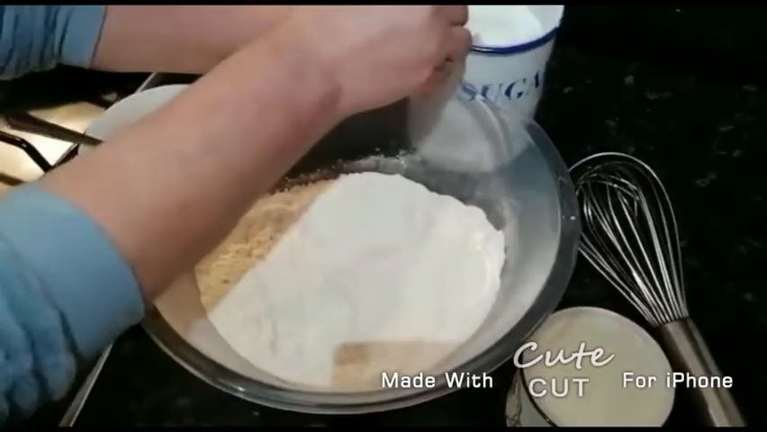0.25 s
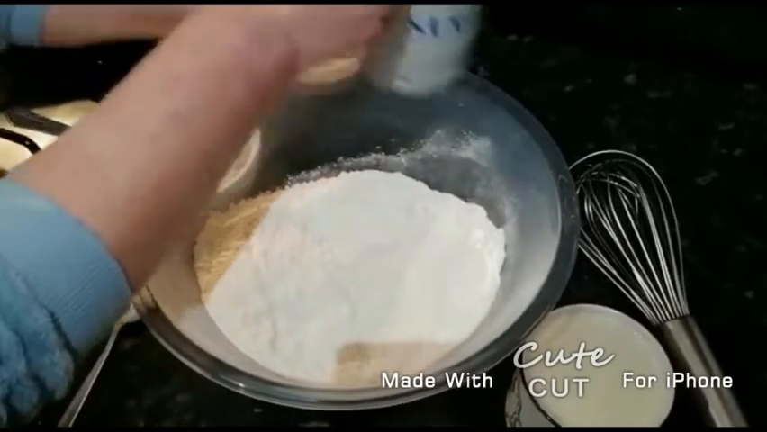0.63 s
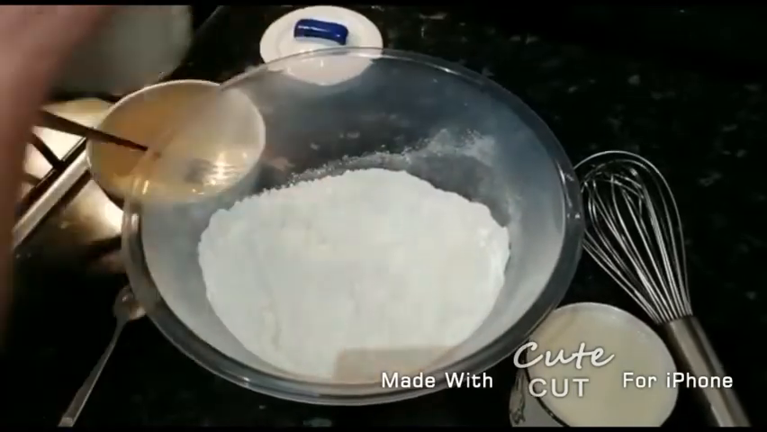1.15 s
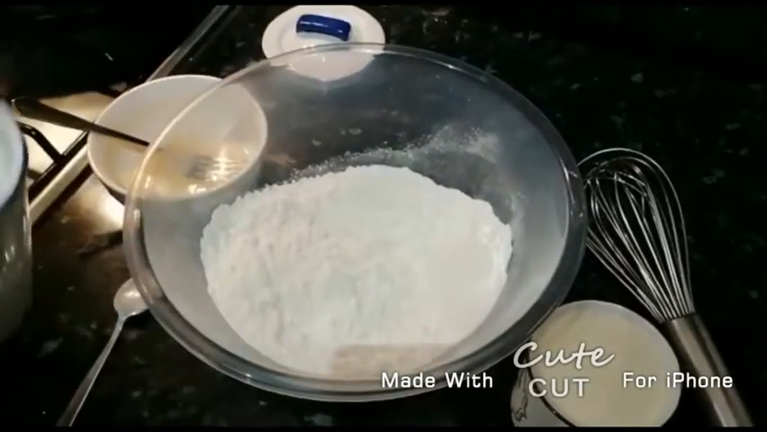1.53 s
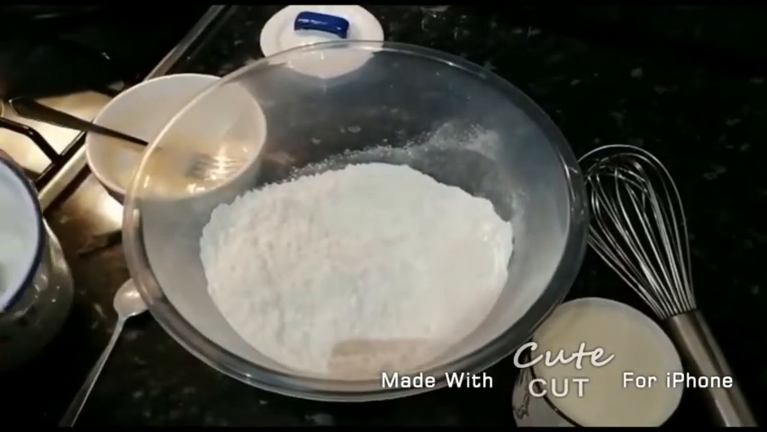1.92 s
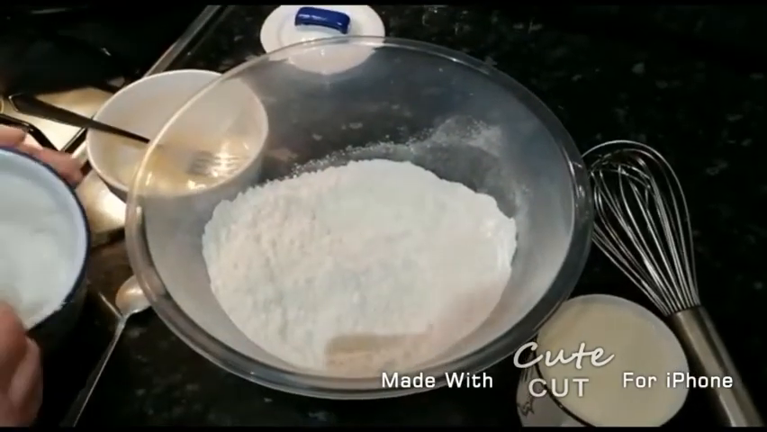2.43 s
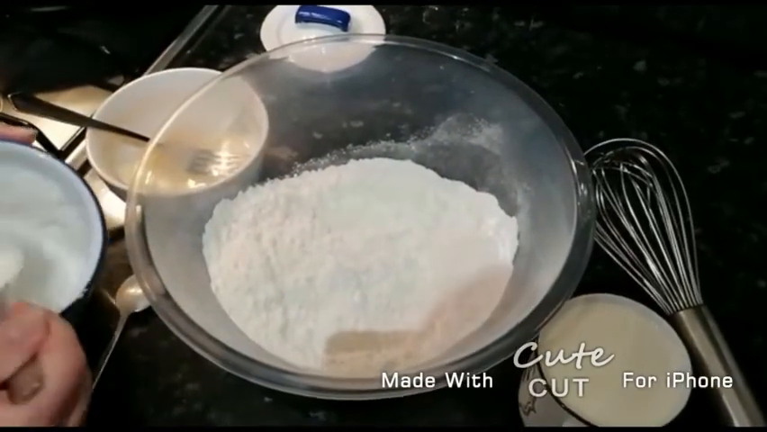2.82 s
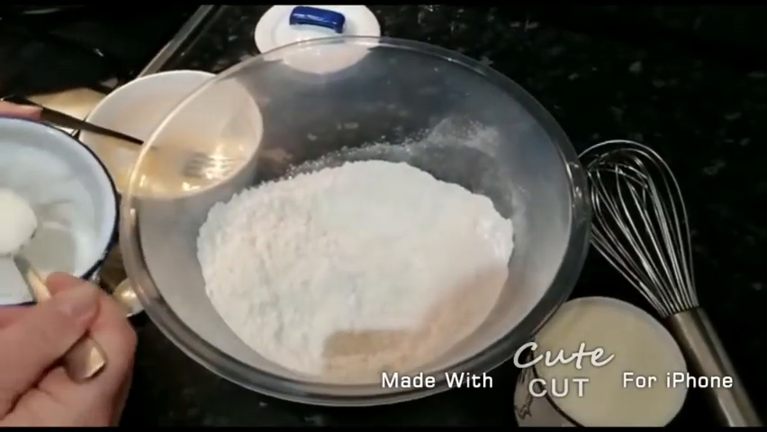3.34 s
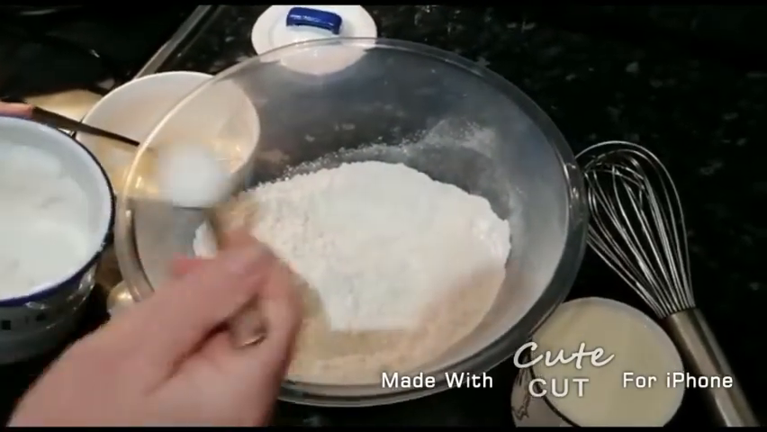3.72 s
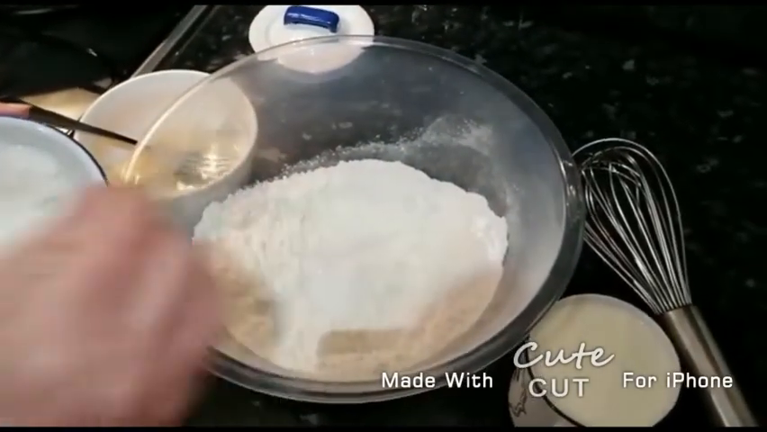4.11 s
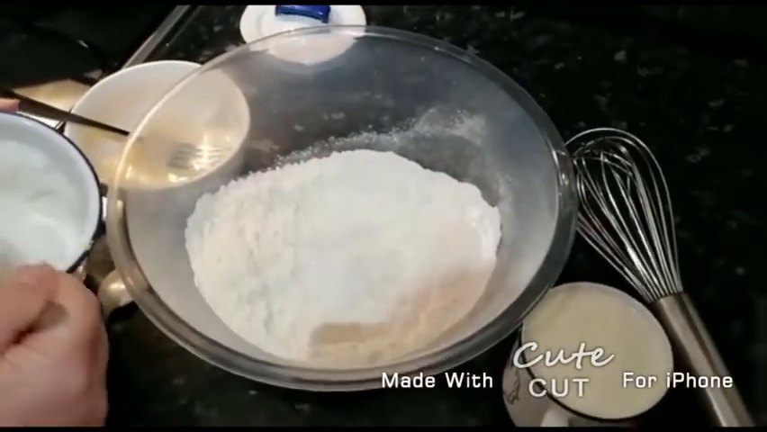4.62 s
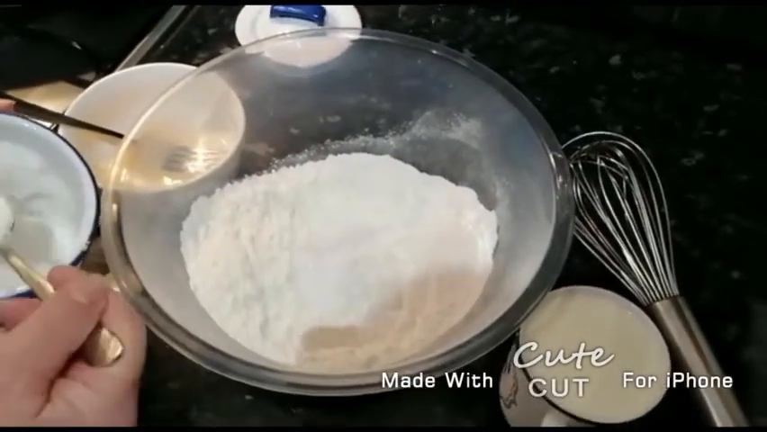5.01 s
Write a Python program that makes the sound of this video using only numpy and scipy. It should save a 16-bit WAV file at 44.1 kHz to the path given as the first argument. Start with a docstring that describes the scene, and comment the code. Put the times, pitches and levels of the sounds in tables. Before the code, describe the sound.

Close in a quiet, hard-walled kitchen, a steel spoon scrapes sugar and taps a glazed jar, then again harder at under a second. A long faint grainy rustle follows, the jar lands on the counter with a boom and clatter, a tap follows, then a softer landing. Later come faint scrapes, small ticks and a busy burst of scooping and taps. One microphone, low room rumble.

```python
"""A steel spoon scrapes sugar in a glazed jar and at once taps its wall, over the soft hum of a quiet kitchen.
More strokes, taps and small ticks follow; twice the jar is set down, the counter booms and the glaze rings.
Strokes are grainy noise through resonances; taps and landings are damped sines with dying noise.
Hard walls answer every hit with a noise tail; the room is shaped noise with narrow appliance notes."""
import sys
import numpy as np
from scipy import signal
from scipy.fft import rfft, irfft, next_fast_len
from scipy.io import wavfile
from scipy.ndimage import uniform_filter1d, map_coordinates

SR = 44100
rng = np.random.default_rng(int(sys.argv[2]) if len(sys.argv) > 2 else 0)


def wav_out(sig):
    """Save sig, one row per channel (or a flat mono array), as 16-bit PCM at SR to the path in sys.argv[1]."""
    wavfile.write(sys.argv[1], SR, np.round(np.clip(np.atleast_2d(sig).T, -1, 1) * 32767).astype(np.int16))


def invert_db(x):
    """Field ratio 10**(x/20) for x, a level in decibels (scalar or array-like)."""
    u = np.asarray(x, float) / 20
    return 10 ** u


N = 231569
SPAN = SR // 2  # length of one hit, in samples

# Levels are relative mix settings unless marked rms.
# Spoon and jar moving through or over sugar: start_s, length_s, scrape_db, fizz_rel_db, scrape_centre_hz
STROKES = [(0.003, 0.046, -60.5, -18, 1940), (0.058, 0.2, -58, -12, 2510), (0.697, 0.02, -65, 1.5, 2930),
           (0.76, .14, -47, -7.5, 2280), (0.937, 0.14, -64.5, -8.5, 2050), (1.029, 0.12, -60, -7, 2770),
           (1.25, 0.72, -66, -12, 2530), (1.976, 0.17, -62, 0, 4360), (2.16, 0.164, -69, -2, 3200),
           (2.483, .03, -75, -0.5, 2400), (2.548, 0.0234, -76, 0, 2400), (2.894, 0.17, -63, -19, 2610),
           (3.339, 0.13, -73, -13, 2920), (3.723, 0.068, -73.5, -4, 2580), (4.013, 0.021, -54, -30, 3900),
           (4.059, 0.14, -55, -45, 2940), (4.155, 0.025, -61.5, -0.5, 2980),
           (4.192, 0.15, -55.5, -4.5, 4050), (4.383, 0.1, -58, -24, 2075), (4.528, 0.073, -67, -7.5, 2730),
           (4.733, 0.07, -64, -15, 4060)]
# Spoon rubbing the wall so the jar's air sings: start_s, length_s, level_db
WALL_RUBS = [(0.816, 0.015, -56), (0.873, 0.018, -48.5), (4.074, 0.068, -63)]
# Fizz of crushed grains: freq_hz, density_db_per_hz
FIZZ_SPECTRUM = [(2940, -11), (5000, -12.5), (6940, -10), (7580, -7.5), (8130, -20.5), (9490, -12.5),
                 (15300, -30)]
# Spoon resonances under the grains: freq_hz, width_hz (before squaring), level_db
SPOON_MODES = [(5970, 49, 0), (7640, 80, -10), (9270, 420, -3.5), (10500, 50, -14), (11540, 190, 4)]
# Scrape of sliding grains: freq_hz, density_db_per_hz
SCRAPE_SPECTRUM = [(940, -35), (1600, 6.5), (1710, -3.5), (2160, -1.5), (2330, -2), (5040, -7.5),
                   (5500, -30), (7150, -14.5), (12100, -120)]
# Spoon taps: start_s, level_db, jar_air_rel_db, treble_rel_db, spoon_note_hz
TAPS = [(0.0486, -26.5, -17.5, -24, 2010), (0.7536, -14, -9.5, -23.5, 2627), (1.0228, -46, -5, -28, 1870),
        (2.3297, -32.5, -15, -32, 3790), (2.353, -39.5, -15, -24.5, 2050),
        (4.1846, -30, -11.5, -16.5, 1950), (4.3904, -36, -17, -28, 1987)]
# Spoon and sugar-damped jar: freq_hz, level_db, t60_s (before the taps cap and shorten it)
JAR_MODES = [(2350, -21, 0.88), (2733, 10.5, 0.16), (3330, -19, 0.08), (3770, -3.5, 0.13), (4030, 7, 0.28),
             (4600, -3, 0.26), (5370, 12, 0.011), (6300, 6, 0.09), (6206, 1.5, 0.15), (6700, -11, 0.2),
             (8200, -14, 0.19), (9040, 9, 0.14), (8980, -32, 0.31), (11800, -27, 0.39), (10700, 18, 0.17),
             (12600, -30, 0.052)]
# Air in the jar: freq_hz, level_db, t60_s
JAR_AIR_MODES = [(1338.5, 4.5, 0.063), (1382, -2.5, 0.071)]
# Noise crack of a tap: freq_hz, density_db_per_hz
TAP_SPECTRUM = [(1000, -10), (1700, -1), (2740, -0.5), (4220, 2), (4940, -4), (8190, -12.5), (9170, -18),
                (12800, -48), (15900, -9)]
# Jar pushed against the counter: start_s, level_db
NUDGES = [(0.048, -37), (2.352, -50.5), (4.1861, -43.5), (4.235, -47), (4.3893, -56.5)]
# Small clicks and short pings: start_s, level_db, pitch_hz, cycles (a third of the t60)
TICKS = [(1.024, -47.5, 4700, 26), (3.898, -44, 5720, 9.5), (3.982, -47.5, 9000, 1.5),
         (4.005, -35.5, 1980, .6), (4.085, -54, 10500, 1.5), (4.128, -24.5, 1400, 0.54),
         (4.64, -53.5, 1320, 23)]
# Jar meets counter at two spots and rocks, so each landing is a list of contacts:
# start_s, boom_db, ring_db, clatter_db, contact_ms
LANDINGS = [
    [(1.874, -5, -39.5, 0, 2.3), (1.8777, -4, -46, -5, 0.9), (1.8796, -5.5, -57, 13, 2.08),
     (1.887, -14, -29.5, -12, 0.78), (1.893, -34, -24.5, 0.5, 1.38)],
    [(2.8675, -20, -78, -34, 2.7), (2.872, -12, -56.5, -17, 2.41), (2.878, -19, -34, -10, 2.18)],
]
# Slab and cupboard below: freq_hz, level_db, t60_s
COUNTER_MODES = [(71.4, -3, 0.26), (142.3, -11.5, 0.044), (167.1, -9, 0.18), (182, 6, .15), (206, -4, 0.18),
                 (250, -4.5, 0.2), (286.2, 2.5, 0.25), (318, 3.5, 0.07), (365.7, 1, 0.11),
                 (399.2, -4.5, 0.12), (421.8, 0.5, 0.073), (472.4, -8.5, 0.17), (545.7, 0, 0.1095),
                 (641.4, 3, 0.081), (780, -2.5, 0.16), (796, -11, 0.16), (1160, -12, 0.27)]
# Jar wall, one list per landing spot: freq_hz, level_db, t60_s
GLAZE_MODES = [
    [(1770, -9.5, 0.064), (4320, -4, .17), (4340, -3, .15), (4600, -19, 0.034), (5230, -12.5, .08),
     (6100, -15.5, 0.087), (7750, -7, 0.11), (7780, -10, 0.09), (8510, -17, 0.082), (9960, -19, .06),
     (10460, -12.5, 0.041), (11680, -15, 0.062), (12590, -21.5, 0.076), (13180, -19.5, .06),
     (14340, -14, .04)],
    [(1713, -3.5, 0.066), (2620, -0.5, 0.036), (4390, -2.5, 0.062), (4530, 10.5, 0.023), (5200, -14, 0.065),
     (7740, -1, 0.063), (8700, -26, 0.041), (10600, -10.5, 0.055), (11650, -11, 0.06), (12650, -21, .04)],
]
# Line width of the glaze, one per landing spot: width_hz
GLAZE_BLUR = [13.4, 20]
# Loose shaking over the ring, one per landing spot: level_db
RATTLE_LEVELS = [14.5, 10]
# Sugar and glaze shaking after a landing: freq_hz, density_db_per_hz
RATTLE_SPECTRUM = [(880, -40.5), (1500, -13.5), (3850, -20), (4370, -1), (4910, -22), (7900, -16),
                   (15300, -26.5)]
# Unresolved small modes of a landing: freq_hz, density_db_per_hz
CLATTER_SPECTRUM = [(180, -30.5), (300, 10), (928, -25.5), (1520, -13), (2210, -22.5), (2360, -20),
                    (3120, -30), (4320, -30), (4620, -29), (15000, -52)]
# Tail of the hard walls: freq_hz, t60_s
WALL_DECAY = [(100, 0.64), (500, 0.37), (3000, 0.44), (12000, 0.26)]
# Room tone: freq_hz, density_db_per_hz
ROOM_SPECTRUM = [(18, -34.5), (30, -7), (48, -15.5), (75, -3.5), (186, -5.5), (314, -13), (441, -11.5),
                 (476, -22), (515, -17), (1250, -29), (3840, -35), (10600, -49.5), (15300, -68.5)]
# Slow drift of the rumble: time_s, level_db_rms
RUMBLE_DRIFT = [(0, -52.5), (0.4, -57.5), (1.0, -56), (2.602, -57.5), (3.4, -57), (4.8, -54.5), (5.25, -59)]
# Appliance notes: freq_hz, width_hz (before squaring), level_db_rms
HUM_NOTES = [(178, 59, -64), (450.5, 25, -74), (1197, 7.2, -79.5)]


def sugar():
    """Crushed grains fizz and make the spoon sing, sliding ones scrape lower, and both stir the jar's air."""
    start, length, db, fizz_db, hz = np.transpose(STROKES)
    pressure_db = 1.5 * wobble(18)  # the hand's pressure wavers
    scrape_db = stroke_db(start, length) + db[:, None] + pressure_db
    effort_db = scrape_db.max(axis=0)
    centre_hz = hz[np.argmax(scrape_db, axis=0)]  # the loudest stroke sets the colour

    def singing_spoon(f):
        modes = sum(invert_db(db) * abs(peak(f, hz, width)) ** 2 for hz, width, db in SPOON_MODES)
        return invert_db(along(FIZZ_SPECTRUM, f)) * (1 + 2.0 * modes)

    rubbing = grains(size_db=2.0)
    fizz_level = invert_db(np.max(scrape_db + fizz_db[:, None], axis=0) + 2.5)
    fizz = fizz_level * filtered(rubbing, singing_spoon)

    sliding = filtered(rubbing, lambda f: invert_db(along(SCRAPE_SPECTRUM, f)))
    scrape = swept(sliding, centre_hz, width_hz=400, lift=2.6)

    rub_start, rub_length, rub_db = np.transpose(WALL_RUBS)
    rubs = invert_db(stroke_db(rub_start, rub_length) + rub_db[:, None]).sum(axis=0)
    air_drive = (invert_db(effort_db - 16) + rubs) * invert_db(1.6 * wobble(38))
    air = air_drive * filtered(grains(size_db=2.2), lambda f: peak(f, 1327, 170) ** 2)
    return fizz + invert_db(effort_db - 6.5) * scrape + invert_db(-2.0) * air


def stroke_db(start, length):
    """Level of each stroke in dB under its peak: it digs in, slows, then stops."""
    attack_s, sag_db_per_s, release_db_per_s = 0.011, 25.5, 247  # release adds to the sag
    t = np.arange(N) / SR - start[:, None]
    attack = 20 * np.log10(np.clip(1 + t / attack_s, 1e-6, 1))  # full at the start time
    sag = sag_db_per_s * np.maximum(t, 0)
    release = release_db_per_s * np.maximum(t - length[:, None], 0)
    return attack - sag - release


def grains(size_db):
    """Dense crushing grains: noise with heavy-tailed sizes in small clumps."""
    sizes = size_db * rng.exponential(size=N)
    return rng.standard_normal(N) * invert_db(sizes + 2.0 * wobble(60))


def taps():
    """Each tap rings spoon, jar and the air in it; nudges knock the counter; small ticks click or ring briefly."""
    out = np.zeros(N + SPAN)
    for s, db, air_db, treble_db, hz in TAPS:
        add(out, s, invert_db(db) * tap(db, air_db, treble_db, hz), room_db=-12)
    knock = nudge()
    for s, db in NUDGES:
        add(out, s, invert_db(db) * knock, room_db=-2.5)
    for s, db, hz, cycles in TICKS:
        tick = ring([(hz, 0, 3 * cycles / hz)], scatter_db=0.5, rise=0.00006)
        add(out, s, invert_db(db) * tick, room_db=-9)
    return out[:N]


def tap(db, air_db, treble_db, hz):
    """Steel on glaze: damped modes, a noise crack, a short spoon note and the jar's air."""
    ring_growth = 0.25  # dB of extra jar ring per dB of tap strength
    tilt = [(5000, 0.025), (7000, treble_db + 19.5)]  # Hz, dB
    modes = [(f, g + along(tilt, f), min(t60, 0.1)) for f, g, t60 in JAR_MODES]
    steel = ring(modes, scatter_db=2.0, damping=2.04, blur_hz=60.5)
    crack_spectrum = [(f, g + along(tilt, f)) for f, g in TAP_SPECTRUM]
    crack = dying(crack_spectrum, [(1000, 0.11), (6000, 0.08), (14000, 0.075)])

    # where the grip lets the spoon ring
    top_db = -5 + 2 * along(tilt, 1.6 * hz)
    partials = [(1.1 * hz, -4, 0.025), (hz, 0, 0.04), (1.07 * hz, -4, 0.03), (1.9 * hz, top_db, 0.03)]
    note = ring(partials, scatter_db=-1.5, blur_hz=150)
    note_db = -10.5 - 1.12 * (treble_db + 24.5)  # a dull tap is mostly that note

    air = ring(JAR_AIR_MODES, scatter_db=4.0, blur_hz=39.5)
    hit = invert_db(-23 + ring_growth * db) * steel + invert_db(11.5) * crack
    hit = hit + invert_db(note_db) * note + invert_db(air_db + 2.5) * air
    return above(hit, hz=1212, order=7)


def nudge():
    """A push on the counter through the jar, favouring the modes near one pitch."""
    favoured_hz, fall_db_per_octave = 308, 9
    modes = [(f, g - fall_db_per_octave * abs(np.log2(f / favoured_hz)), t60) for f, g, t60 in COUNTER_MODES]
    return ring(modes, scatter_db=2.0, damping=1.1, rise=0.0023)


def landings():
    """A soft push booms in the counter, duller the longer the contact; hard edges clatter and ring the glaze."""
    out = np.zeros(N + SPAN)
    boom = ring(COUNTER_MODES, scatter_db=2.0)
    for contacts, wall, blur_hz, rattle_db in zip(LANDINGS, GLAZE_MODES, GLAZE_BLUR, RATTLE_LEVELS):
        for s, boom_db, ring_db, clatter_db, ms in contacts:
            low = counter_push(boom, ms)
            clatter = dying(CLATTER_SPECTRUM, [(300, 0.075), (3000, 0.11), (12000, 0.091)])
            clatter = above(clatter, hz=264, order=2)
            glaze = ring(wall, scatter_db=4, rise=0.0019, blur_hz=blur_hz)
            glaze += invert_db(rattle_db) * dying(RATTLE_SPECTRUM, [(2000, 0.09), (12000, 0.083)])
            hit = invert_db(clatter_db) * clatter - invert_db(boom_db) * low + invert_db(ring_db) * glaze
            add(out, s, hit, room_db=-6.5)
    return above(out[:N], hz=59.8, order=4)


def counter_push(boom, ms):
    """The slab's first swing, half a cycle per contact time, and its boom smoothed by the push."""
    u = np.arange(SPAN) / SR
    push = np.hanning(max(round(ms * SR / 1000), 4))
    swing = 1.735 * np.sin(2 * np.pi * u * 500 / ms)
    swing = swing * invert_db(-60 * u * 1000 / (9 * ms))  # t60 of nine contact times
    swing = swing * np.minimum(u * 3000 / ms, 1)  # rises over a third of the contact
    flex = signal.fftconvolve(swing, push[::2] / push[::2].sum())[:SPAN]  # a long contact has no sharp edge
    pushed_boom = signal.fftconvolve(boom, push / push.sum())[:SPAN]
    return above(flex, hz=118.2, order=2) + invert_db(-17.0) * pushed_boom


def add(track, s, hit, room_db):
    """Places a hit with the walls' answer, which starts after the first bounce."""
    tail = np.pad(dying([(100, 0)], WALL_DECAY), (round(0.006 * SR), 0))
    answer = signal.fftconvolve(hit, tail)[:SPAN]
    track[round(s * SR):][:SPAN] += hit + invert_db(room_db) * answer


def kitchen():
    """Rumble in lumps, smoother hiss and narrow unsteady appliance notes."""
    def low(f):
        return 1 / (1 + (f / 500) ** 4)

    def room(f):
        return invert_db(along(ROOM_SPECTRUM, f))

    rumble_db = np.interp(np.arange(N) / SR, *np.transpose(RUMBLE_DRIFT)) + 1.4 * wobble(2.9)
    rumble = invert_db(rumble_db) * filtered(rng.standard_normal(N), lambda f: room(f) * low(f))
    hiss_db = -67.82 + 0.27 * wobble(3.03)
    hiss = invert_db(hiss_db) * filtered(rng.standard_normal(N), lambda f: room(f) * (1 - low(f)))
    notes = np.zeros(N)
    for hz, width, db in HUM_NOTES:
        notes += invert_db(db) * filtered(rng.standard_normal(N), lambda f: peak(f, hz, width) ** 2)
    return rumble + hiss + notes


def ring(modes, scatter_db, damping=1, rise=0.00044, blur_hz=0):
    """Damped sines at new strengths; damping shortens every decay, loose contact makes the phases wander."""
    hz, db, t60 = np.transpose(modes)[:, :, None]
    t = np.arange(SPAN) / SR
    db = db + scatter_db * rng.standard_normal(db.shape)
    hold = 16  # samples per step of the phase's random walk
    steps = rng.standard_normal((len(hz), SPAN // hold + 1)) * np.sqrt(2 * np.pi * hold * blur_hz / SR)
    walk = np.cumsum(steps, axis=1) - steps[:, :1]
    wander = uniform_filter1d(np.repeat(walk, hold, axis=1)[:, :SPAN], size=hold)
    waves = invert_db(db - 60 * damping * t / t60) * np.sin(2 * np.pi * hz * t + wander)
    return waves.sum(axis=0) * (1 - np.exp(-t / rise))


def dying(spectrum, t60s):
    """Noise of energy 1 whose bands each die at their own speed, after a rise of 0.23 ms."""
    hz, t, z = signal.stft(rng.standard_normal(SPAN), SR, nperseg=128)
    level_db = along(spectrum, hz)[:, None] - 60 * t / along(t60s, hz)[:, None]
    x = signal.istft(z * invert_db(level_db), SR, nperseg=128)[1][:SPAN]
    x = x * np.minimum(np.arange(SPAN) / (0.00023 * SR), 1) ** 2
    return x / np.linalg.norm(x)


def swept(x, centre_hz, width_hz, lift):
    """x with a resonance that follows a curve, brought to rms 1."""
    hz, t, z = signal.stft(x, SR, nperseg=256)
    centre = centre_hz[np.minimum((t * SR).astype(int), N - 1)]
    gain = 1 + lift * np.exp(-((hz[:, None] - centre) / width_hz) ** 2)
    return unit(signal.istft(z * gain, SR, nperseg=256)[1][:N])


def filtered(x, response):
    """x times a response of frequency, brought to rms 1."""
    m = next_fast_len(N + SR // 2)
    spectrum = rfft(x, m) * response(np.fft.rfftfreq(m, 1 / SR))
    return unit(irfft(spectrum, m)[:N])


def peak(f, hz, width_hz):
    """Complex response of one resonance, 1 at its centre."""
    return 1j * f * width_hz / (hz * hz - f * f + 1j * f * width_hz)


def above(x, hz, order):
    """Causal high-pass: takes the lowest bass out of hits."""
    return signal.sosfilt(signal.butter(order, hz, "high", fs=SR, output="sos"), x)


def wobble(rate):
    """A smooth random curve, rate knots a second."""
    return map_coordinates(rng.standard_normal(int(N * rate / SR) + 4), [np.arange(N) * rate / SR])


def along(points, hz):
    """Reads (Hz, value) points on a log frequency axis."""
    f, v = np.transpose(points)
    return np.interp(np.log(hz + 1), np.log(f + 1), v)


def unit(x):
    """Brought to rms 1."""
    return x / np.sqrt(np.mean(x ** 2) + 1e-20)


def scene():
    """All sources at one microphone."""
    return (landings() + taps() + sugar() + kitchen())[None]


def top_cut(x):
    """Nothing passes above the cut-off."""
    return signal.sosfilt(signal.butter(12, 16080, fs=SR, output="sos"), x)


def record(dry):
    """The microphone path closes steeply at the top."""
    low_pass = signal.cheby2(10, 50, 16200, fs=SR, output="sos")  # 50 dB down from 16.2 kHz
    mix = signal.sosfilt(low_pass, dry)
    return top_cut(mix)


dry = scene()
out = record(dry)
wav_out(out)
```